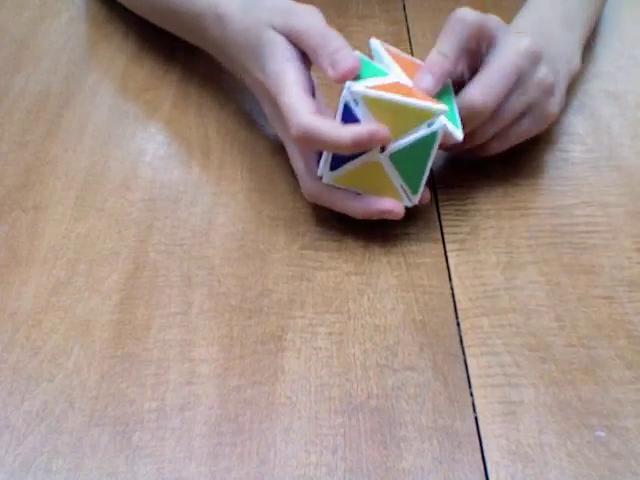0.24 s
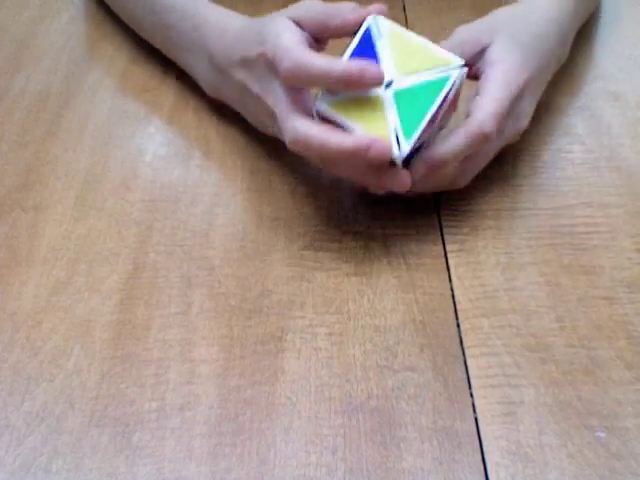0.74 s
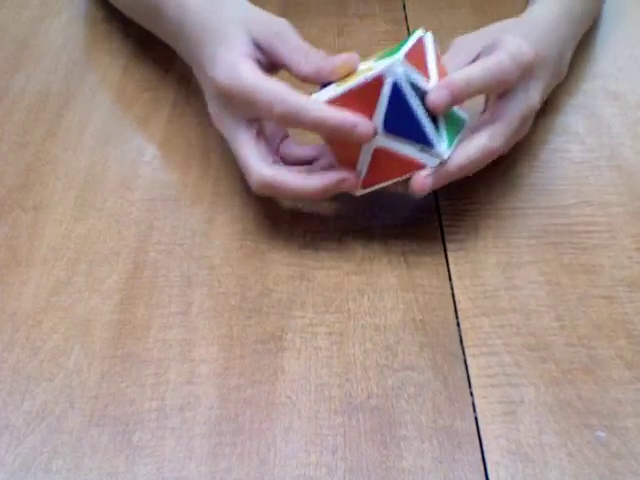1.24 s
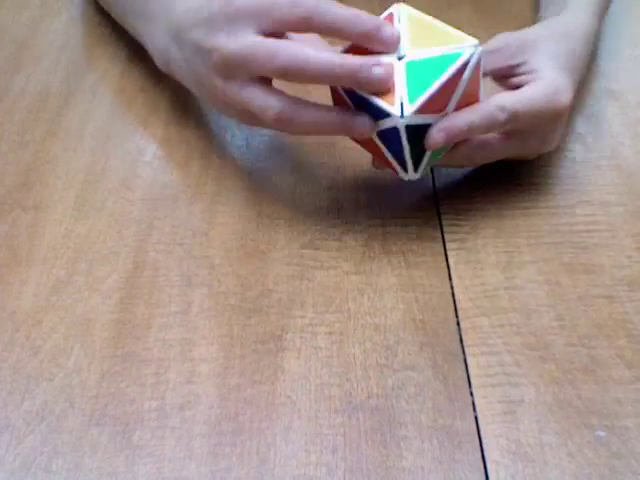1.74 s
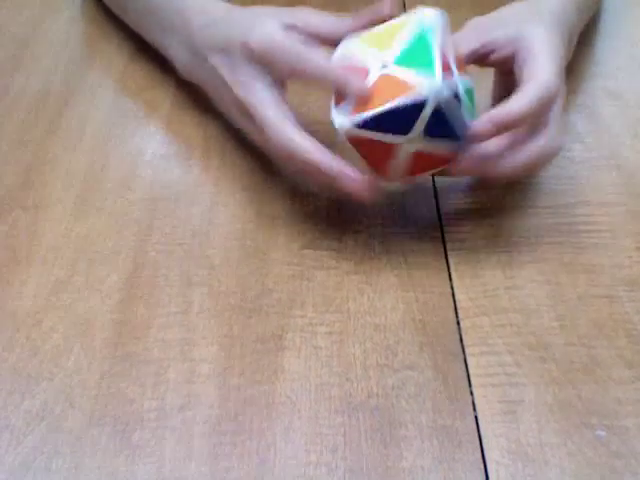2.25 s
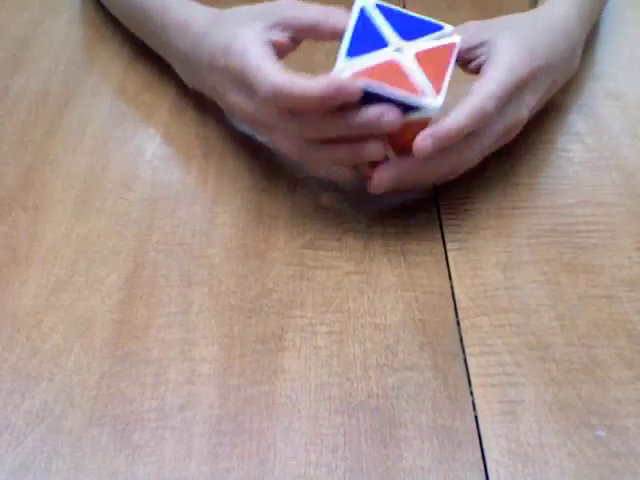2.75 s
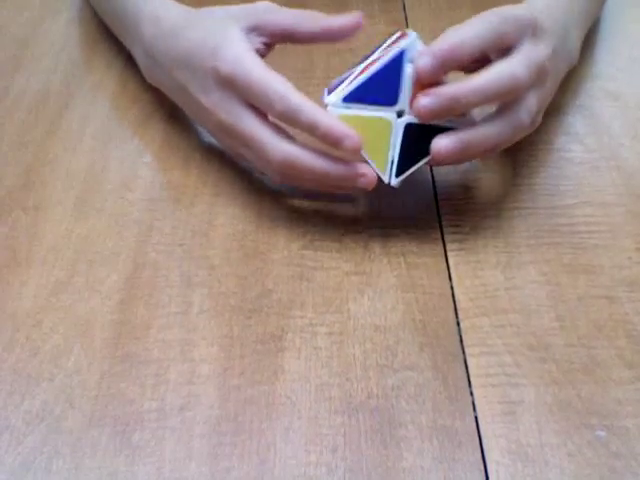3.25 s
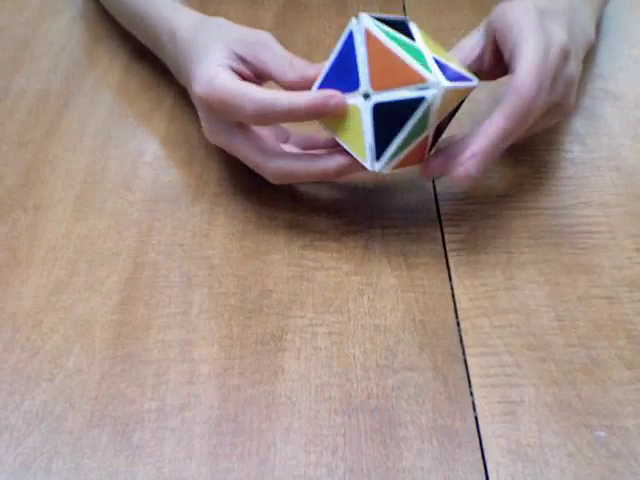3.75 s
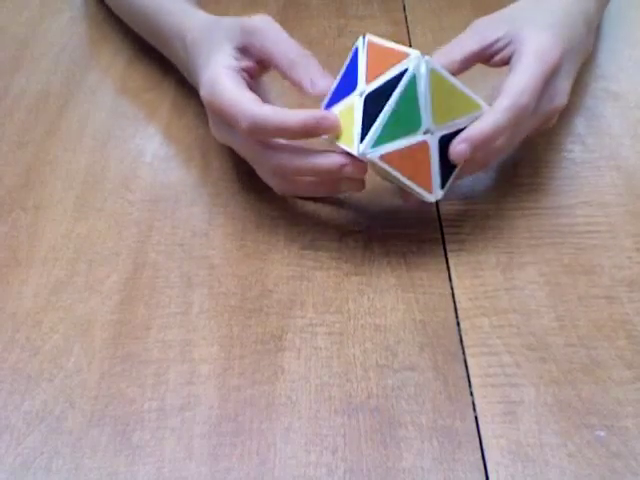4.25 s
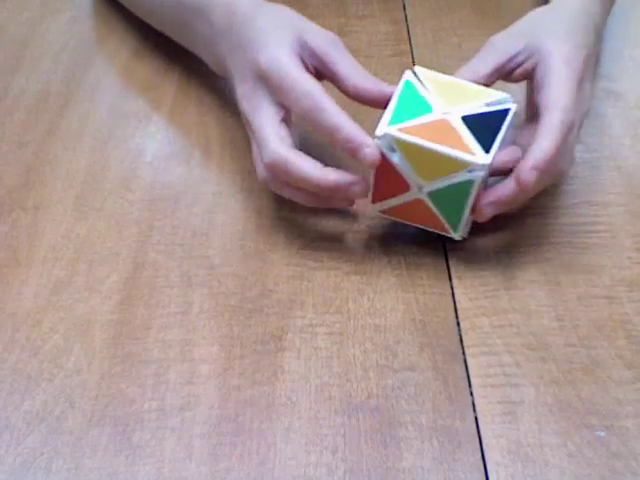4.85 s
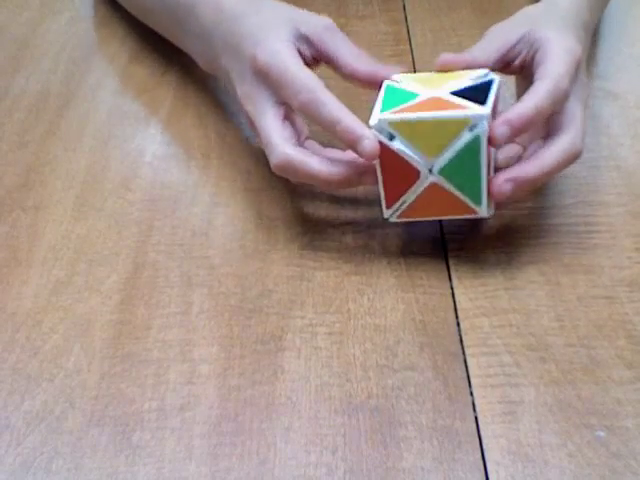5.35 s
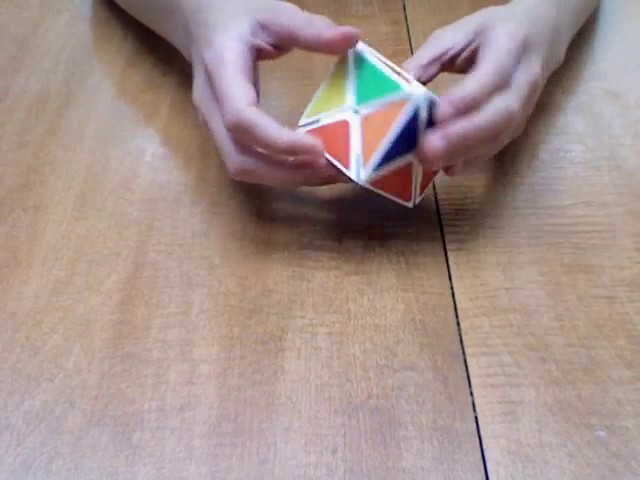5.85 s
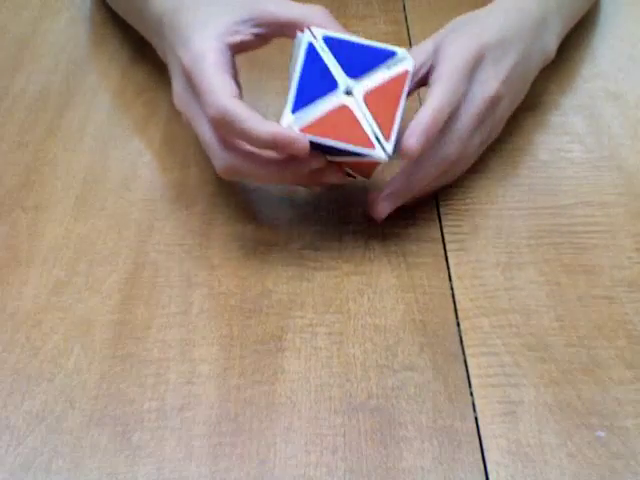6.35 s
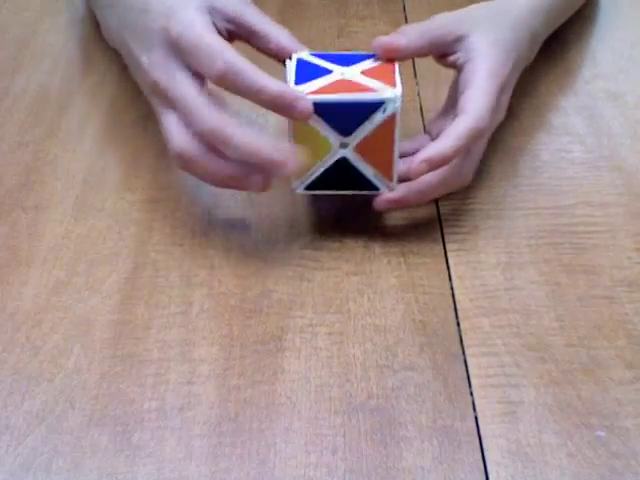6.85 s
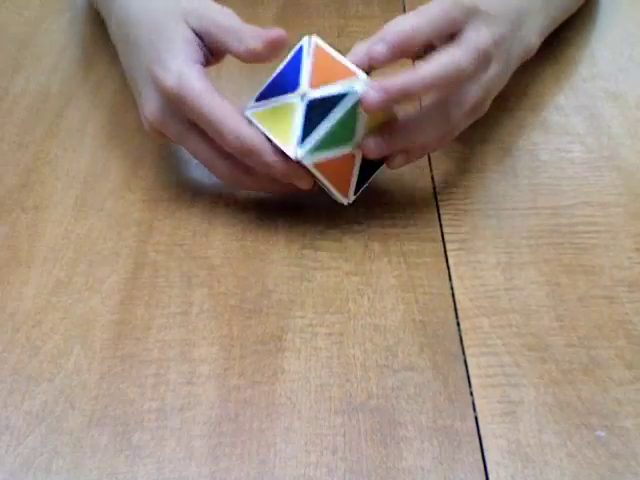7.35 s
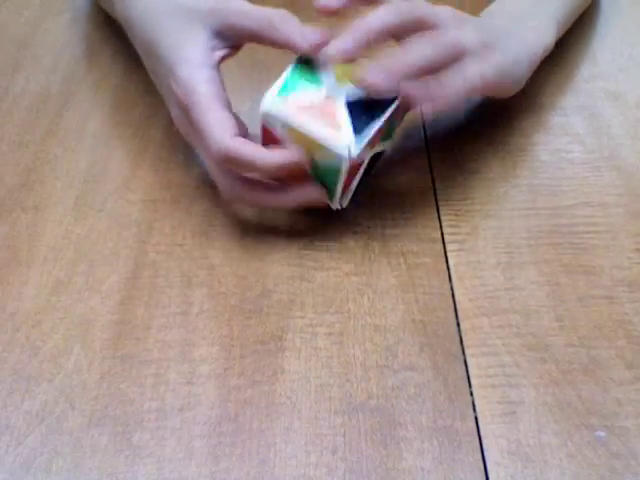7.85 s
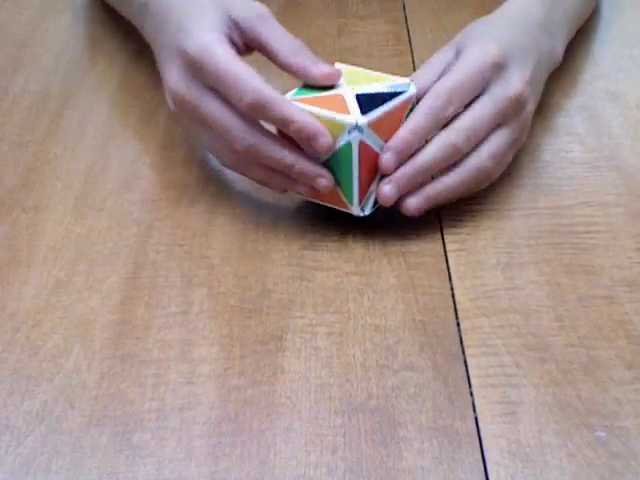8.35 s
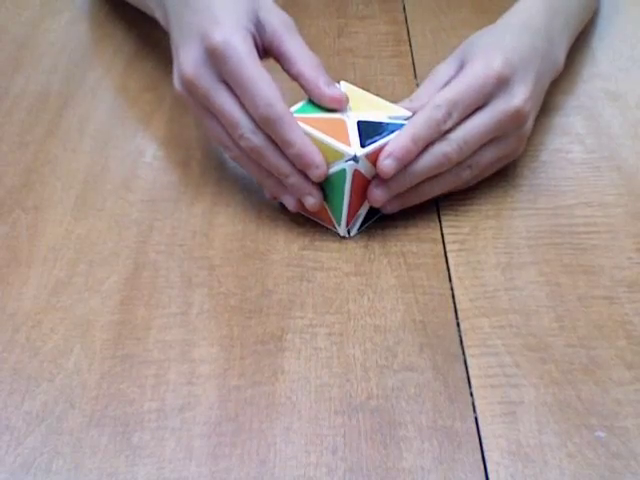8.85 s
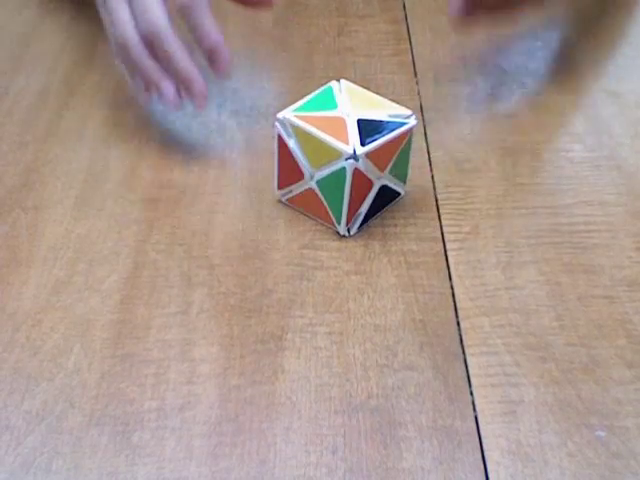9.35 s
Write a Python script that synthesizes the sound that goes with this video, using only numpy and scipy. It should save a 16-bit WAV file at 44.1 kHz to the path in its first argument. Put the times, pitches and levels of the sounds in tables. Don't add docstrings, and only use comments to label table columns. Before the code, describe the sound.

Steady electrical hum and faint whine, sparse light plastic snaps from a twisted puzzle, ending with booming knocks and a skin slap on wood.

```python
import sys
import numpy as np
from scipy import signal
from scipy.fft import rfft, irfft, next_fast_len
from scipy.io import wavfile
from scipy.ndimage import map_coordinates

SR = 44100
rng = np.random.default_rng(int(sys.argv[2]) if len(sys.argv) > 2 else 0)


def dump_mix(stems):
    frames = np.atleast_2d(stems).T
    limited = np.clip(frames, -1, 1)
    pcm = np.round(limited * 32767).astype(np.int16)
    wavfile.write(sys.argv[1], SR, pcm)


def ratio(d):
    e = np.asarray(d, float) / 20
    return 10 ** e


N = 423360


def unit(x):
    return x / np.sqrt(np.mean(x ** 2) + 1e-20)


def along(points, hz):
    f, v = np.transpose(points)
    return np.interp(np.log(hz + 1), np.log(f + 1), v)


def wobble(rate):
    coarse = np.arange(0, N + 32, 32)
    knots = rng.standard_normal(int(N * rate / SR) + 4)
    return np.interp(np.arange(N), coarse, map_coordinates(knots, [coarse * rate / SR]))


def ramp(start, length, db, rise, fall):
    t = np.arange(N) / SR
    return db - rise * np.maximum(start - t, 0) - fall * np.maximum(t - start - length, 0)


def filtered(x, response):
    m = next_fast_len(N + SR // 2)
    return irfft(rfft(x, m) * response(np.fft.rfftfreq(m, 1 / SR)), m)[..., :N]


def resonant(x, peaks):
    def response(f):
        total = 0
        for k, (centre, width, db) in enumerate(peaks):
            total = total + (-1) ** k * ratio(db) * 1j * f * width / (centre ** 2 - f * f + 1j * f * width)
        return total
    return filtered(x, response)


def tones(lines, cycles, shake_db, scatter=1, smear=0):
    out = np.zeros(N)
    for k, db in lines:
        level = np.sqrt(2) * ratio(db + shake_db * wobble(2.92))
        turns = k * cycles + smear * k * k + scatter * rng.standard_normal()
        out += level * np.cos(2 * np.pi * turns)
    return out


def bursts(times, levels_db, t60, rise=.001, pitches_hz=None, width_hz=300):
    out, t = np.zeros(N + SR), np.arange(1500) / SR
    for k, (s, db) in enumerate(zip(times, levels_db)):
        puff = ratio(-60 * t / t60) * (1 - np.exp(-t / rise)) * rng.standard_normal(len(t))
        if pitches_hz is not None:
            peak = signal.iirpeak(pitches_hz[k], pitches_hz[k] / width_hz, SR)
            puff = signal.lfilter(*peak, signal.lfilter(*peak, puff))
        out[round(s * SR):][:len(t)] += ratio(db) * puff / np.abs(puff).max()
    return out[:N]


# f/Hz, t60/s
ROOM = [(200, 0.38), (1500, 0.58), (4000, 0.31), (9000, 0.18)]


def room(x):
    hz, t, z = signal.stft(rng.standard_normal(SR // 2), SR, nperseg=256)
    decay = ratio(-60 * t / along(ROOM, hz)[:, None])
    tail = signal.istft(z * decay, SR, nperseg=256)[1]
    return signal.fftconvolve(np.pad(x, (300, 0)), tail / np.linalg.norm(tail))[:N]


# f/Hz, level/dB per Hz
HISS_FLOOR = [(25, -87), (60, -80), (105, -67), (150, -70), (270, -72), (480, -76), (670, -73), (900, -78),
              (1700, -84.5), (2900, -88.5), (4400, -91.5), (6500, -94), (8200, -92.5), (15000, -95.5)]
# t/s, level/dB
ARM_SHOVES = [(0.4, -48), (1.2, -62), (1.65, -53), (1.98, -58), (2.96, -52), (6.0, -69), (7.7, -60),
              (8.15, -64), (8.72, -64), (9.3, -60), (9.55, -42)]


def hiss():
    floor = filtered(rng.standard_normal(N), lambda hz: ratio(along(HISS_FLOOR, hz)) * np.sqrt(SR / 2))
    lean = ratio(-73)
    for s, db in ARM_SHOVES:
        lean = lean + ratio(ramp(s, 0, db, rise=70, fall=45))
    rumble = filtered(rng.standard_normal(N), lambda hz: (hz / 30) ** 2 / (1 + (hz / 45) ** 5))
    return floor + lean * ratio(2.5 + 3 * wobble(6)) * unit(rumble)


# f/Hz, width/Hz, level/dB rms a line
DISPLAY_HUMPS = [(7270, 270, -92), (8280, 500, -74.5), (9580, 400, -75.5), (10600, 900, -83),
                 (11600, 500, -80), (12200, 500, -80), (13100, 900, -82), (14100, 250, -79),
                 (15250, 400, -84)]


def display():
    hz = 29.95 * np.arange(200, 525)
    humps = sum(ratio(db) * np.exp(-((hz - c) / w * 2) ** 2) for c, w, db in DISPLAY_HUMPS)
    uneven = rng.standard_normal(len(hz)) + 1j * rng.standard_normal(len(hz))
    lines = np.zeros(N // 2 + 1, complex)
    lines[np.round(hz * N / SR).astype(int)] = humps * uneven
    return irfft(lines, N) * N / 2


# f/Hz, level/dB rms
SPINDLE_LINE = (90.0, -35.0)
# f/Hz, level/dB rms
STRAY_LINES = [(59.4, -62), (72.2, -58), (118.6, -63), (188.2, -59), (239.9, -64), (2985.0, -70),
               (2998.4, -70)]
# multiple of its pitch, level/dB rms
BUZZ_LINES = [(1, -55.6), (2, -37.2), (3, -47.0), (5, -62.0), (6, -54.9), (7, -52.3), (8, -63.4),
              (9, -50.3), (10, -54.0), (11, -63.2), (12, -74.9), (13, -70.6), (14, -57.1), (15, -61.2),
              (16, -64.2), (17, -66.0), (18, -64.2), (19, -69.0), (21, -64.7), (22, -58.2), (23, -61.5),
              (24, -77.8), (25, -61.7), (26, -57), (27, -64.3), (29, -69.0), (30, -72.2), (31, -78.0),
              (34, -75.2), (37, -72.4)]
# multiple of its turning rate, level/dB rms
FAN_LINES = [(1, -56), (4, -55), (8, -63), (9, -59), (12, -61), (16, -62), (19, -59), (20, -66), (24, -67),
             (28, -62), (32, -69), (36, -62)]
# f/Hz, level/dB rms
WHINE_LINES = [(3053.2, -73), (4946.9, -72), (7999.9, -59), (9455.8, -73), (9833.8, -75), (9863.7, -71),
               (9893.7, -71), (9923.6, -75), (11053.1, -71), (11804.7, -75), (11928.9, -74), (12071.0, -73),
               (12195.4, -70), (12508.9, -71), (12946.8, -66), (12976.8, -75), (13354.8, -75),
               (13384.7, -75), (13698.3, -72), (15248.5, -66)]


def laptop():
    t = np.arange(N) / SR
    buzz_hz, fan_hz = 213.7, 54.62
    spindle = tones([SPINDLE_LINE], t, shake_db=.15)
    strays = tones(STRAY_LINES, t, shake_db=3.5)
    buzz = tones(BUZZ_LINES, buzz_hz * t + .02 * wobble(.6), shake_db=.6, scatter=.045, smear=.002)
    fan = tones(FAN_LINES, fan_hz * t + 0.032 * wobble(1.5), shake_db=2.0)
    whine = tones(WHINE_LINES, t, shake_db=1.8)
    return spindle + strays + ratio(.2) * buzz + ratio(0.1) * fan + ratio(0.8) * whine + display()


def ring(modes, t, rise_cycles):
    out = np.zeros(len(t))
    for hz, db, t60 in modes:
        swell = (1 - np.exp(-t * hz / rise_cycles)) ** 2
        out -= ratio(db - 60 * t / t60) * swell * np.sin(2 * np.pi * hz * t)
    return out


# f/Hz, level/dB, t60/s
BOOM_MODES = [(105.3, 4, 0.23), (68.7, -4, 0.23), (119.4, -1.5, 0.14)]
THUD_MODES = [(133.7, 8.5, 0.053), (188.5, -5.5, 0.18), (252, -4.5, 0.052)]
BOARD_MODES = [(225, -1.5, 0.12), (251, 1, 0.11), (302, 0.5, 0.088), (366, 4.5, 0.059)]
KNOCK_MODES = [(469, -9.5, 0.15), (578, 7.5, 0.04), (637, 12.5, 0.031), (791, -0.5, 0.052),
               (918, -10, 0.094)]
# f/Hz, width/Hz, level/dB
CRACK_PEAKS = [(840, 220, 2.5), (1580, 490, 6), (2320, 370, 6.5), (3250, 1100, 1.5), (4350, 3000, -18.5),
               (6440, 1100, -36), (9900, 5000, -29)]
# octaves over the boom, level/dB
GROUP_COUPLING = [
    (0, 0.5),
    (0.6, -2),
    (1.5, 3.6),
    (2.6, -1.16),
    (3.6, 1),
]
# t/s, level/dB, focus/octaves over the boom, fall-off/dB an octave
TABLE_BLOWS = [(0.401, -25, 0.01, 10), (1.25, -24.5, 0.01, 7.5), (2.991, -22.5, 0.01, 8.5),
               (7.646, -22, 2.32, 24), (7.652, -11.5, 0.74, 12.5), (8.08, -23, 0.01, 21),
               (8.634, -17, 3.45, 16), (8.635, -0.5, 0.05, 5.5), (8.64, -11, 1.7, 20),
               (8.638, -2.1, 2.5, 10.5), (8.685, -22.5, 1.5, 12), (8.772, -24.5, 2.76, 17),
               (9.019, -24.5, 2.14, 18), (9.049, -20, 1.9, 15), (9.059, -32, 1.7, 22),
               (9.101, -19.5, 0.7, 20), (9.155, -26, 1, 17), (9.386, 9.5, 0.43, 30.5),
               (9.404, 1, 0.057, 13), (9.416, -9, 0.01, 18)]
# t/s, level/dB
SKIN_SLAPS = [
    (9.046, -40),
    (9.059, -30),
    (9.404, -32),
    (9.415, -0.5),
    (9.418, -13),
]
# f/Hz, width/Hz, level/dB
SLAP_PEAKS = [(750, 290, -0.5), (1110, 170, -1), (1560, 270, -4), (2600, 280, -22), (3200, 460, -31),
              (5030, 5000, -13)]


def table():
    wood, t = np.zeros(N + SR), np.arange(SR // 2) / SR
    groups = np.array([ring(BOOM_MODES, t, rise_cycles=1.93), ring(THUD_MODES, t, rise_cycles=0.99),
                       ring(BOARD_MODES, t, rise_cycles=1.4), ring(KNOCK_MODES, t, rise_cycles=1.0)])
    octaves, coupling_db = np.transpose(GROUP_COUPLING)
    s, db, focus, fall = np.transpose(TABLE_BLOWS)[:, :, None]
    shares_db = db + coupling_db - fall * np.abs(octaves - focus)
    times, crack_db = s[:, 0], shares_db[:, -1]
    for start, levels_db in zip(times, shares_db):
        wood[round(start * SR):][:len(t)] += ratio(levels_db[:-1]) @ groups
    crack = bursts(times, crack_db + 3, .005, rise=.0002)
    crack += bursts(times, crack_db - 3, 0.034, rise=0.00078)
    slap = resonant(bursts(*np.transpose(SKIN_SLAPS), 0.012), SLAP_PEAKS)
    slap = filtered(slap, lambda hz: 1 / (1 + 1j * hz / 2800) ** 3)
    return wood[:N], ratio(16) * slap, ratio(14.5) * resonant(crack, CRACK_PEAKS)


# t/s, level/dB, hardness/dB, body f/Hz, edge f/Hz
PIECE_SNAPS = [(0.173, -25.5, -6, 1560, 2330), (0.192, -24.5, 1, 1530, 3730),
               (0.2895, -30.5, 1, 1500, 3810), (0.405, -31, -12, 1550, 4490),
               (0.4385, -33, -20, 1390, 2990), (0.465, -30, -19, 1580, 2290),
               (0.4866, -32, -16, 1350, 3000), (0.8606, -27, 1.5, 1400, 2320),
               (1.532, -23.5, -3, 1440, 4390), (1.5777, -14.5, -0.5, 1350, 3500),
               (1.5934, -33, -11, 1520, 3000), (1.6442, -32, -16, 1590, 2990), (1.679, -36, 3, 1010, 3720),
               (1.6875, -33, -4, 1350, 3820), (1.6938, -28, -3, 1290, 2990), (2.141, -30.5, -4, 1280, 3850),
               (2.173, -25, -6, 1290, 4430), (2.364, -39.5, 8.5, 1610, 4470),
               (2.587, -29.5, -12, 1540, 2360), (3.301, -31, -20, 1440, 3200), (3.861, -30, -5, 1720, 4490),
               (6.473, -30.5, 4, 1400, 2430), (6.645, -28.5, -4, 1440, 2310),
               (9.046, -25.5, -27, 1490, 2990)]
# t/s, level/dB, sharpness/dB
CORNER_TICKS = [(0.1497, -36, -12), (0.384, -35, -20), (0.8174, -40, 0), (1.1604, -41, 2), (1.315, -37, 2),
                (1.413, -35.5, -2), (1.509, -38, -15), (1.6342, -42, -17), (1.673, -31, -4),
                (2.061, -38, -3), (2.3684, -35, 3.5), (2.5154, -43, 0), (2.557, -32, -18),
                (2.7816, -32, -5), (2.907, -36, -1), (4.4466, -36, -18), (5.5847, -39, -13),
                (6.2146, -35, -5), (6.2573, -32, -17), (6.493, -41, 3), (6.8329, -35, -18),
                (6.9686, -42, -4), (7.311, -36.5, 2), (7.6464, -36.5, 1), (7.885, -42, 0),
                (7.9942, -43, -9), (8.064, -33.5, -4), (9.404, -34.5, 0), (8.525, -34, -18)]


def contacts():
    snaps = [(s, db, hard, -6 + 0.67 * hard, body_hz, edge_hz) for s, db, hard, body_hz, edge_hz in PIECE_SNAPS]
    stray = np.exp(.035 * rng.standard_normal((len(CORNER_TICKS), 2)))
    ticks = [(s, db, -2 + 0.43 * sharp, sharp, 1490 * a, 3650 * b)
             for (s, db, sharp), (a, b) in zip(CORNER_TICKS, stray)]
    return np.transpose(snaps + ticks)


# f/Hz, width/Hz, level/dB
CUBE_BODY = [(1350, 550, 2), (1560, 230, 6.5)]
CUBE_EDGE = [(2400, 660, -4.5), (3650, 350, -2.5), (4660, 1200, -7.5)]
CUBE_TIP = [(6110, 2800, -1.5), (8820, 390, 6.5), (12000, 3000, -11)]
# t/s, length/s, level/dB, brightness/dB
FACE_RUBS = [
    (0.172, 0.021, -34, -11),
    (0.29, 0.065, -39, -14),
    (0.402, 0.046, -33.5, -22),
    (0.442, 0.045, -55, 8.5),
    (1.48, 0.065, -39, -8),
    (1.577, 0.011, -32, -5),
    (1.634, 0.09, -46, -7),
    (2.15, 0.033, -49, -1),
    (2.565, 0.035, -40.5, -11),
    (6.468, 0.008, -44, -2),
]


def cube():
    s, body_db, edge_db, tip_db, body_hz, edge_hz = contacts()
    out = bursts(s, body_db + 1.5, .011, rise=.0008, pitches_hz=body_hz, width_hz=400)
    out += bursts(s, body_db + edge_db - 6, 0.007, pitches_hz=edge_hz, width_hz=650)
    out += resonant(bursts(s, body_db + edge_db + 15, .008), CUBE_EDGE)
    out += resonant(bursts(s, body_db + tip_db + 10.5, 0.016), CUBE_TIP)
    slips = rng.standard_normal(N) * ratio(3.5 * wobble(200))
    body, edge, tip = [unit(resonant(slips, part)) for part in (CUBE_BODY, CUBE_EDGE, CUBE_TIP[1:2])]
    for start, length, db, bright_db in FACE_RUBS:
        press = ratio(ramp(start, length, db - 4, rise=700, fall=700))
        dry_hiss = ratio(-4 + 1.7 * bright_db) * tip
        out += press * (body + ratio(bright_db) * edge + dry_hiss)
    return out


def scene():
    wood, slap, crack = table()
    pieces = cube()
    echo = room(ratio(-9.5) * crack + ratio(-13.5) * wood + ratio(-12.0) * pieces)
    mono = wood + slap + crack + pieces + echo + laptop() + hiss()
    return mono * ratio([[-.1], [.1]])


def apart(x, share, depth_db):
    z = signal.stft(x, nperseg=2048)[2]
    chosen = np.repeat(rng.random((32, z.shape[1])) < share, 33, axis=0)[:len(z)]
    weight = np.clip(np.arange(len(z)) / 60, .6, 1)[:, None]
    scrambled = z * chosen * weight * np.exp(2j * np.pi * rng.random(z.shape))
    side = signal.istft(scrambled, nperseg=2048)[1][:N]
    return ratio(depth_db) * np.array([side, -side])


def low_pass(x):
    return signal.sosfilt(signal.butter(12, 16470, fs=SR, output="sos"), x)


def record(dry):
    held = dry / (1 + np.abs(dry / .97) ** 8) ** (1 / 8)
    held = held + apart(held.mean(axis=0), share=.04, depth_db=-11)
    mix = filtered(held, lambda hz: hz < 15760)
    return low_pass(mix)


dry = scene()
out = record(dry)
dump_mix(out)
```